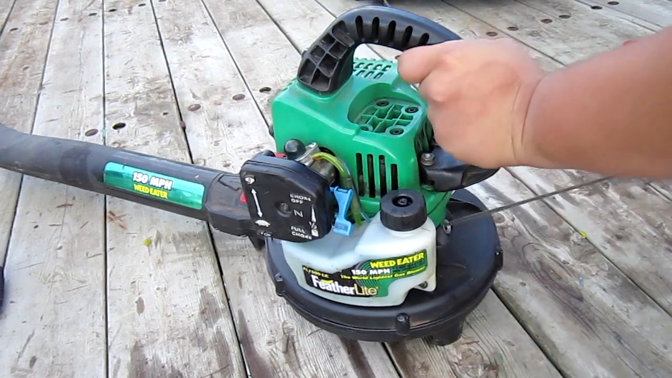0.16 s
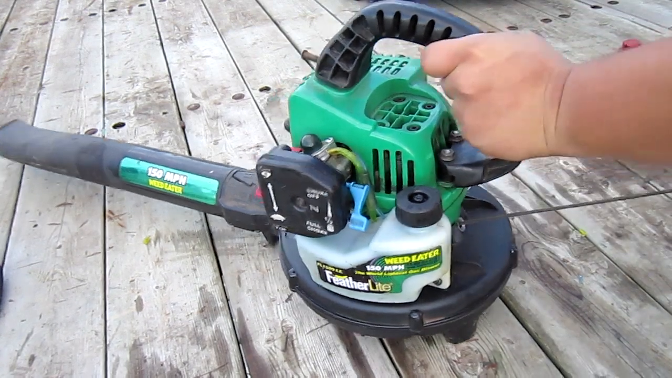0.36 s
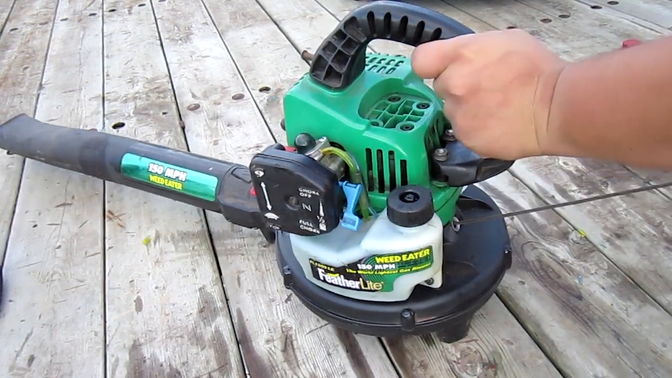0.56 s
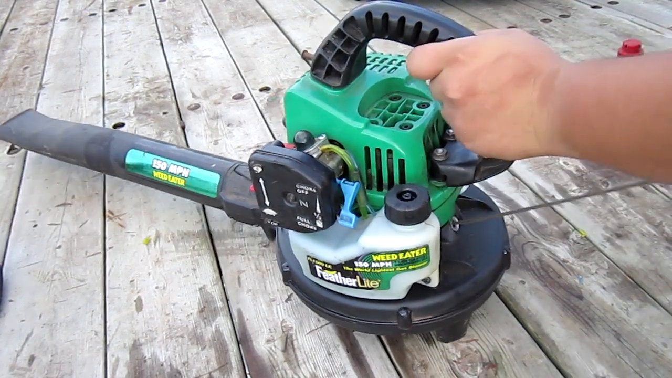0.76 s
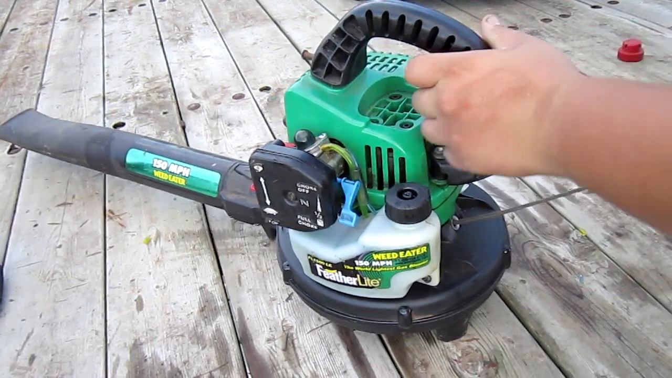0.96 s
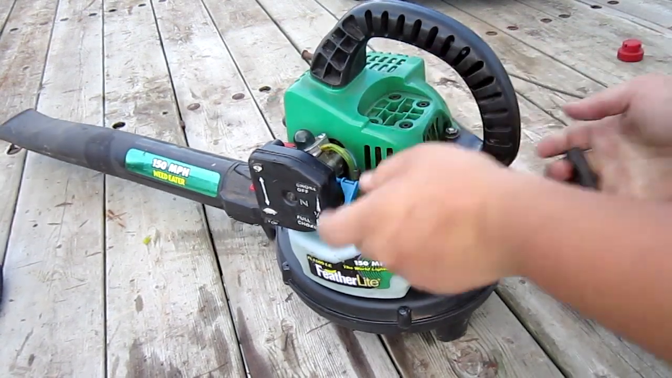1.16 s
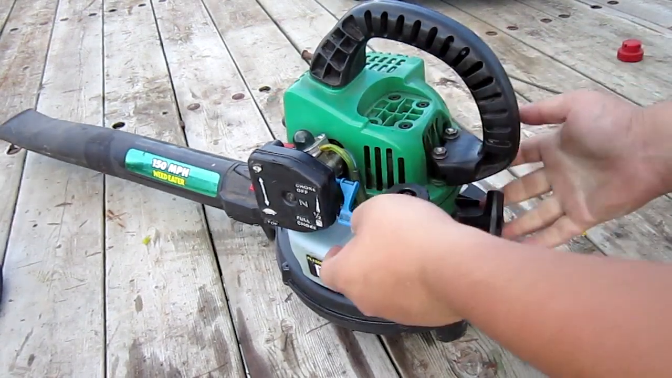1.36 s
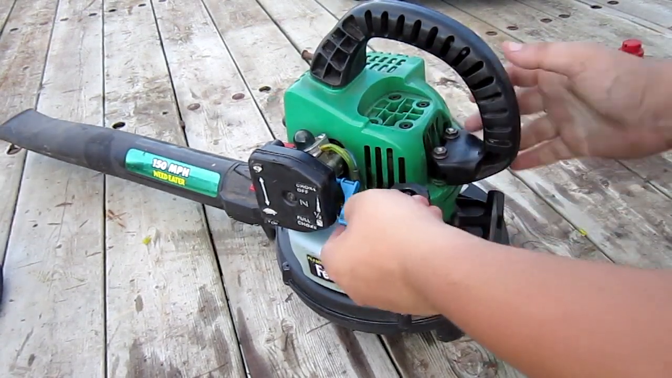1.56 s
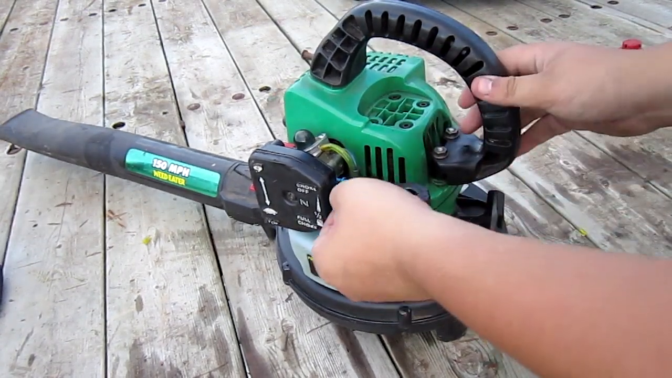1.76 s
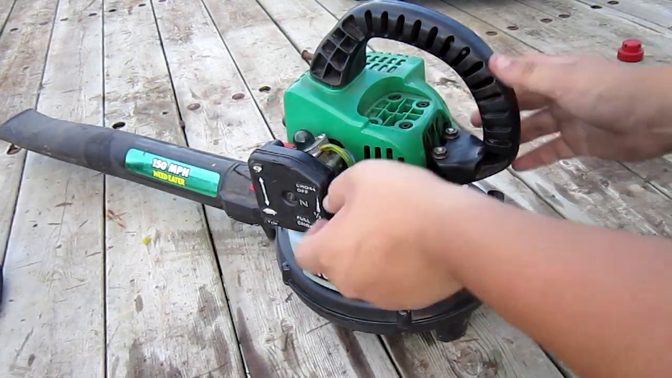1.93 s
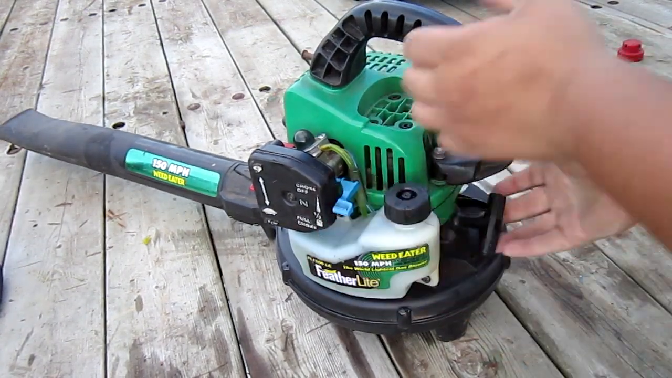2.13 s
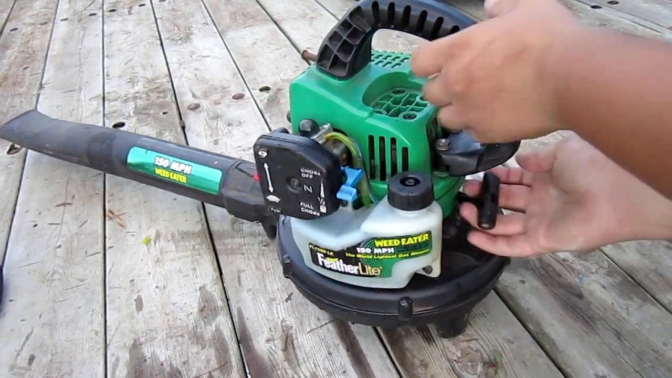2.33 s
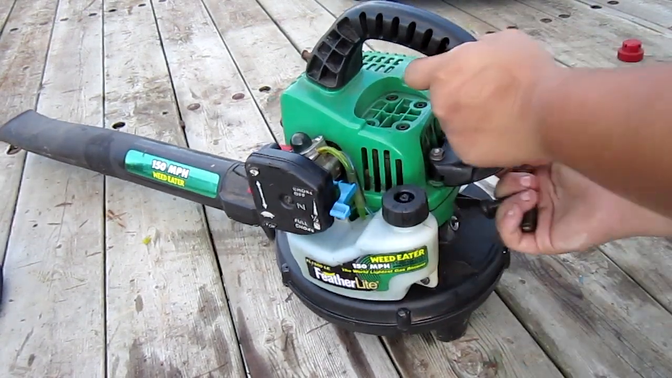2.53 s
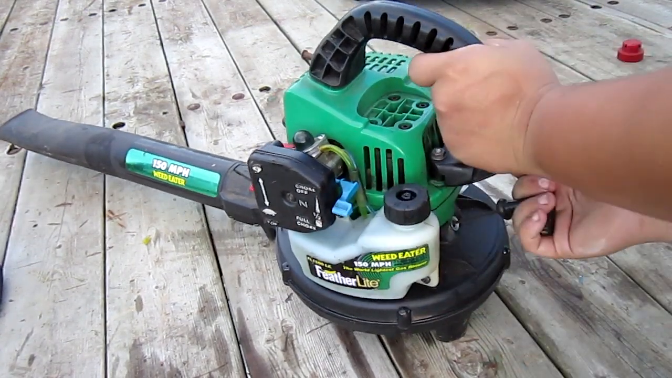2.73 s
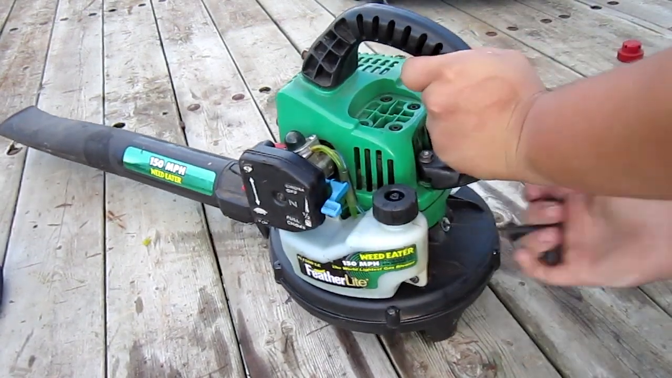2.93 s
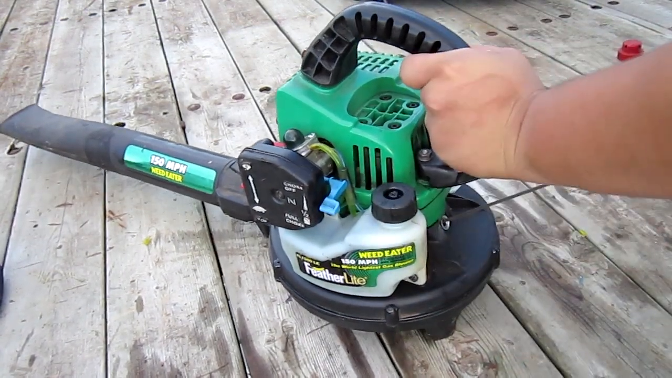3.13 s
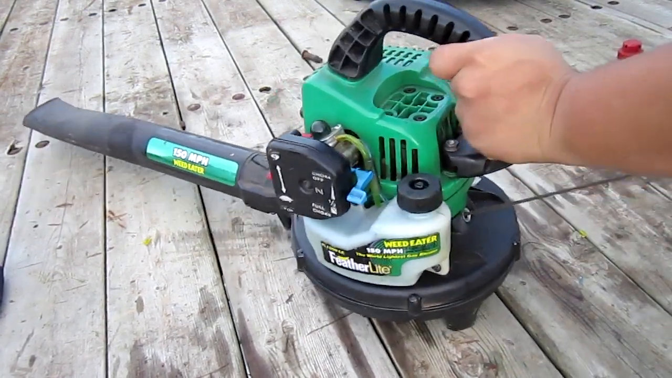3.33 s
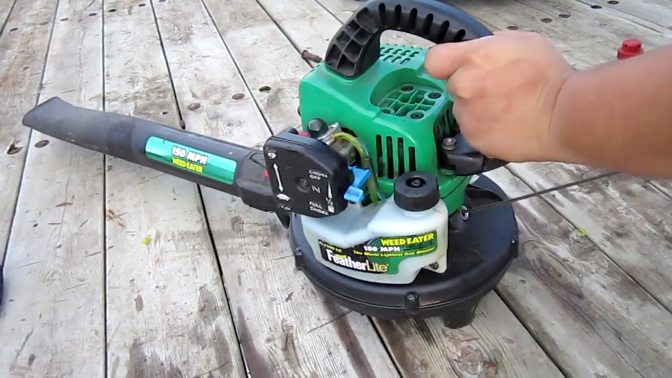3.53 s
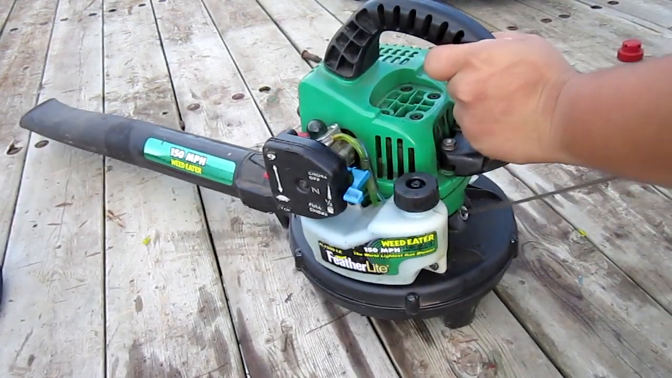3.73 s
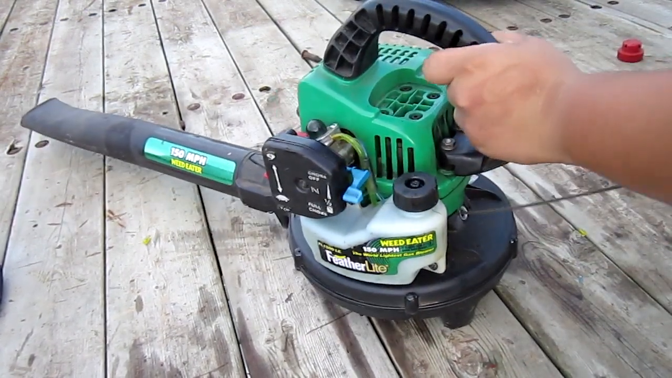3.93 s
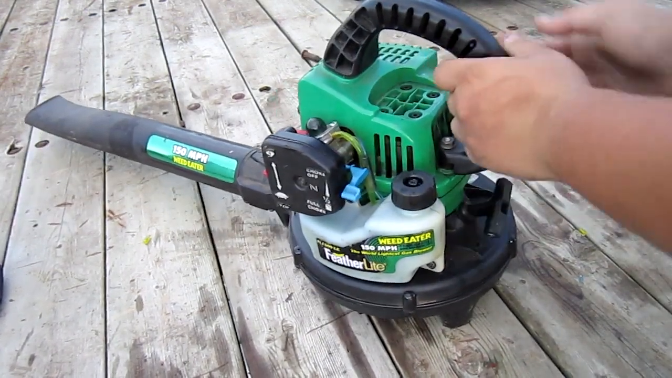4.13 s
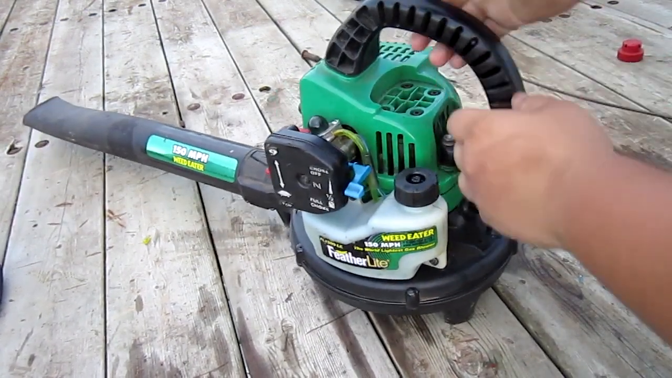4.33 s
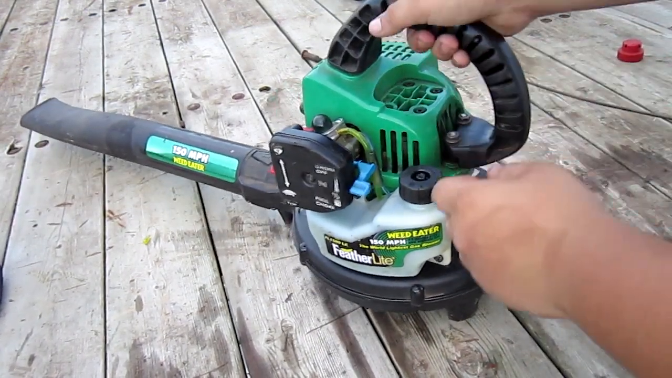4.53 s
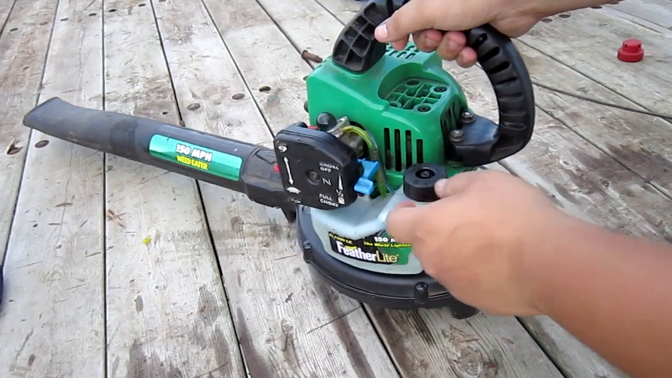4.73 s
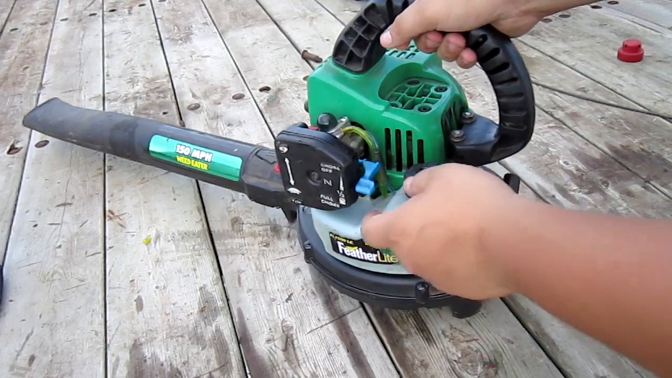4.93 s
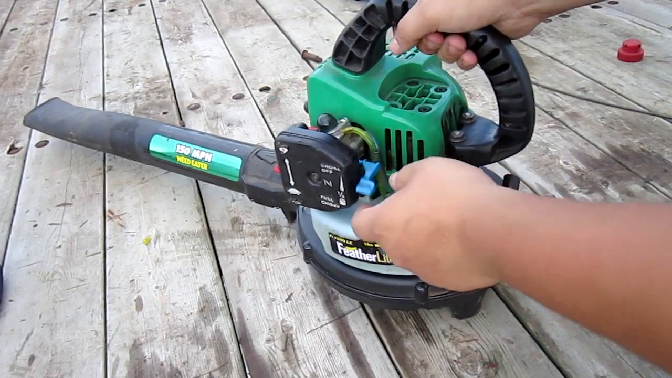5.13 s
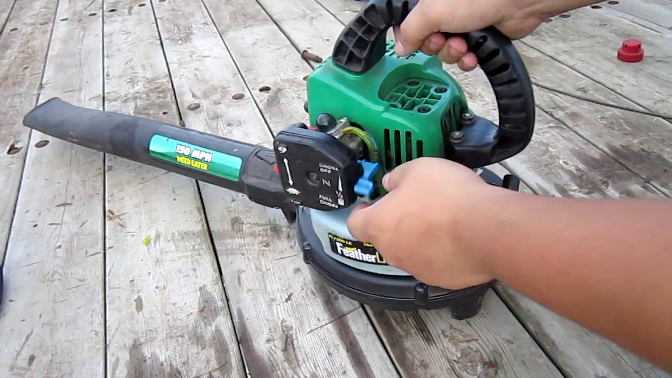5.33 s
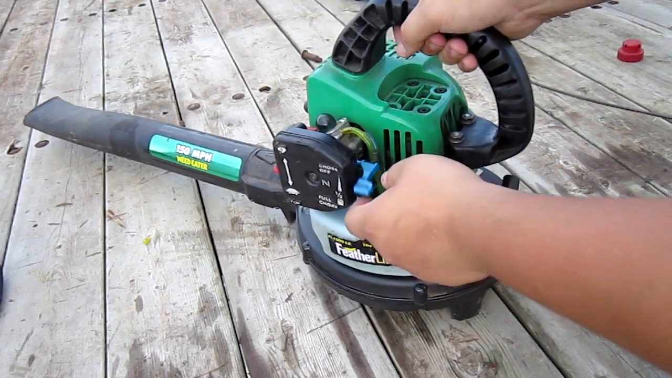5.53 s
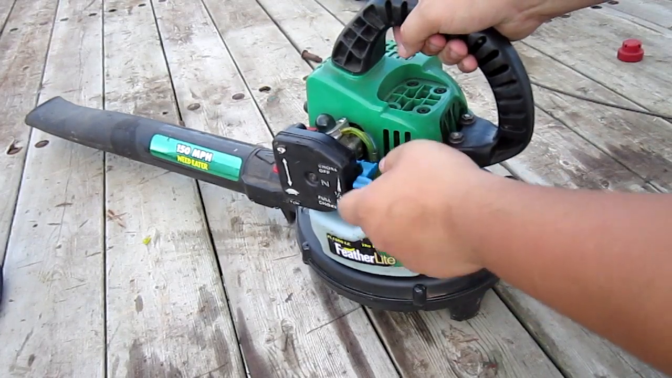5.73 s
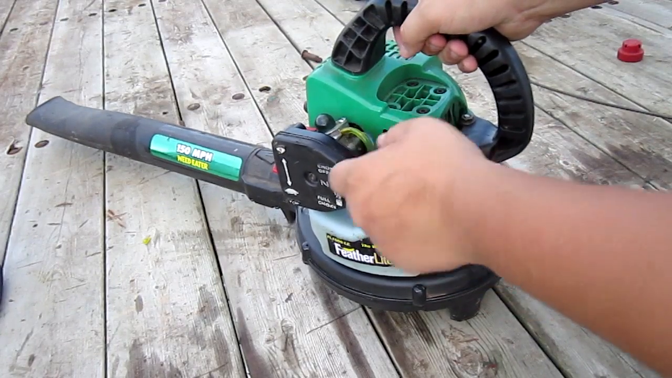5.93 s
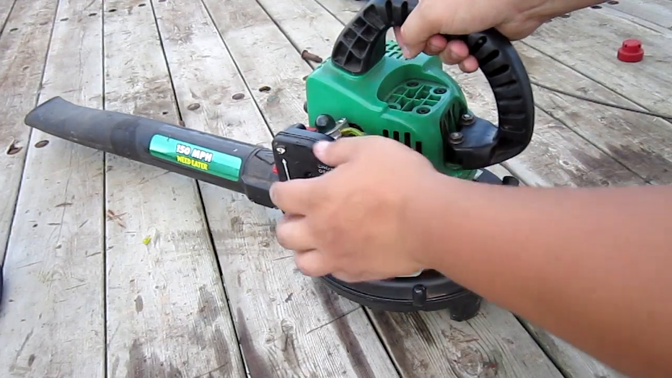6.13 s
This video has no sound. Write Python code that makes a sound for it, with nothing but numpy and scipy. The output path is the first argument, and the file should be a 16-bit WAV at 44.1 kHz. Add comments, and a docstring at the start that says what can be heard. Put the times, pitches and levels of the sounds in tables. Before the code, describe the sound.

A leaf blower is heard close up on a wooden deck outdoors, over faint hiss. Right at the start the starter rope is pulled with a jerky rattle, and the small two-stroke engine turns over in muffled puffs, stopping by 0.8 seconds. From 0.5 seconds the rope rewinds with ratchet clicks that spread out, ending in a sharp plastic knock at 1.4. A lull follows, with very faint distant bird chirps and soft hand brushes. From 2.5 to 3 seconds come several knocks, thumps and small spring twangs. At 3 seconds the rope is pulled again. The engine coughs and pops from about 3.3, stumbles briefly and catches around 4.2. It climbs in pitch to a lumpy idle of hollow puffs, exhaust beats and piston clatter under a rising, throbbing fan hum, still running at the end, around 6.3 seconds.

```python
"""Pull-starting a leaf blower

A small two-stroke, close up on a wooden deck. The first pull only spins it and the rope ratchets home;
on the second it coughs, catches and climbs to a lumpy idle, firing about every third turn. Each turn
gives two hollow port puffs and a piston clatter under the rising fan hum. Far off, a bird chirps."""
import sys
import numpy as np
from scipy import signal
from scipy.fft import rfft, irfft
from scipy.io import wavfile
from scipy.ndimage import uniform_filter1d

SR = 44100
rng = np.random.default_rng(int(sys.argv[2]) if len(sys.argv) > 2 else 0)


def put_to_file(sound):
    """Save the sound as 16-bit audio at rate SR, in the file named by the first command-line argument."""
    columns = np.atleast_2d(sound).T  # one column per channel
    safe = np.clip(columns, -1, 1)
    whole_steps = np.round(safe * 32767)
    wavfile.write(sys.argv[1], SR, whole_steps.astype(np.int16))


N = 277389
T = np.arange(N) / SR

# crank speed on the pull that dies and the pull that catches: (time [s], speed [turns/s])
FIRST_PULL = [(.08, 13.3), (.2, 32), (.38, 34), (.55, 27.4), (.75, 25), (.81, 7.4)]
SECOND_PULL = [(3.0, 10.45), (3.1, 28.61), (3.22, 35.93), (3.5, 34.33), (3.68, 31.81), (3.82, 34.46),
               (4.1, 50.1), (4.27, 61.5), (4.38, 65.2), (4.55, 68.5), (4.72, 70.7), (4.96, 74),
               (5.13, 75.3), (5.22, 77.6), (5.55, 81.6), (5.65, 81.3), (5.9, 82.9), (6.29, 86.1)]
# moments when the firing comes one turn early: (time [s])
EARLY_FIRINGS = [4.88, 5.16, 5.34]
# lone hard firings, before and as the engine catches: (time [s], level [dB])
COUGHS = [(3.35, -16), (3.466, -19.5), (3.642, -14.5), (3.736, -16.5), (3.829, -27), (3.879, -17),
          (3.956, -20), (4.004, -20.5), (4.042, -16), (4.1, -14), (4.163, -23), (4.268, -19), (4.363, -19)]
# resonances of the port cavity, cylinder shroud, muffler shell and blower tube:
# (frequency [Hz], width [Hz], gain [dB])
PORT_MODES = [(802, 60, 9.5), (965, 310, 11), (1130, 260, -22.5), (1700, 500, -37)]
SHROUD_MODES = [(1370, 83, 0), (1470, 67, 2), (1810, 60, 2), (2117, 63, 2), (2770, 110, -8)]
MUFFLER_MODES = [(3536, 260, 2), (5220, 400, -3.5)]
TUBE_MODES = [(510.5, 76, -3), (920, 140, -2.5), (1118, 85, -4), (2900, 150, -6.5)]
# tone colours of the engine's voices: (frequency [Hz], gain [dB])
EXHAUST_EQ = [(35, -36), (75, -32.5), (120, -18), (175, 0), (250, -2), (390, 0), (520, -3), (650, -17),
              (1200, -20), (2500, -37.5), (7500, -60), (11000, -100)]
CLATTER_EQ = [(150, -20), (500, 5), (1300, 6.5), (1800, 4), (2600, -2), (3400, -10.5), (4200, -7),
              (5300, -11.5), (7000, -22.5), (9000, -53.5), (11000, -82.5)]
TICK_EQ = [(500, -21.5), (1700, 12), (2500, -5.5), (3100, -0.5), (3550, -2), (4100, -5), (4800, -5),
           (5300, -8.5), (6000, -18), (7000, -17), (9000, -38), (11000, -64.5)]
COUGH_EQ = [(35, -41), (60, -14.5), (396, 2), (1110, 0.5), (2070, -5.5), (2900, -16.5), (4140, -15),
            (4900, -30), (5560, -22), (6040, -38), (6440, -29.5), (9000, -55), (11700, -84.5),
            (19800, -120)]
# partials of the impeller and the muffler: (multiple of crank speed, relative level [dB])
FAN_TONES = [(7, -24), (14, -25.5), (21, -33), (35, -42)]
DRONE_TONES = [(1, -8.5), (2, -2.5), (3, 1.5), (4, -18), (5, -7), (9, -11), (10, 2.5), (11, -5), (12, -7)]

# rope running over the starter pulley: (start [s], end [s], level [dB])
ROPE_RUNS = [(0.075, 0.122, -31), (0.113, 0.336, -22.5), (0.6, 1.39, -49.5), (2.557, 3.003, -44),
             (2.997, 3.031, -23), (3.032, 3.22, -23)]
# rope jerking against the compression: (time [s], level [dB], pulley ring [Hz])
JERKS = [(.117, -16.5, 373), (.135, -20, 654), (.146, -16.5, 1160), (.186, -24, 393), (.208, -22, 630),
         (.23, -21, 985), (.245, -19, 1900), (.26, -18, 353), (.289, -18, 1150), (.329, -15.5, 393),
         (2.955, -18.5, 1512), (3.027, -16, 638), (3.041, -14, 1150), (3.075, -16, 1190), (3.098, -21, 791),
         (3.118, -19, 1410), (3.129, -22, 1800), (3.146, -19.5, 390), (3.177, -23, 1140), (3.202, -16, 331)]
# pawls scraping as the rope goes back: (start [s], end [s], level [dB])
PAWL_BUZZES = [(0.47, 0.543, -50), (0.608, 0.753, -34), (0.87, 1.125, -55.5)]
# ratchet clicks, spreading out as the pulley slows:
# (time [s], level [dB], relative treble [dB], pulley ring [Hz], pawl ring [Hz])
RATCHET_CLICKS = [(0.499, -17.5, -16.5, 1980, 4130), (0.532, -23.5, -8.5, 1660, 4100),
                  (.568, -13, -19, 1910, 4000), (0.604, -20, -11.5, 1400, 4470),
                  (0.67, -14.5, -22, 1867, 4100), (0.71, -30, -6, 1499, 4530),
                  (0.765, -21, -12.5, 2180, 4170), (.781, -20.5, -20, 2240, 3990),
                  (.808, -27, -30, 2080, 4100), (0.847, -29, -32, 2100, 4100), (.897, -30, -25, 1700, 4100),
                  (0.914, -21, -11.5, 2220, 4670), (0.9399, -17.5, -15.5, 1940, 4770),
                  (0.9643, -23.5, -8, 2270, 4200), (0.9905, -23, -10.5, 1610, 4080),
                  (1.0198, -22, -13.5, 1400, 3600), (1.05, -22, -11, 1830, 4470),
                  (1.0826, -21.5, -14, 2620, 4420), (1.119, -19.5, -12.5, 2170, 4720),
                  (1.173, -17.5, -14.5, 1980, 3760), (1.2469, -19, -10.5, 1590, 4930),
                  (1.3319, -20.5, -8.5, 1430, 4250)]
# deck, housing, pulley and pawls ringing at each click: (frequency [Hz], width [Hz], gain [dB])
RATCHET_MODES = [(202, 17, 12.5), (365, 31, -1), (2060, 180, -15), (2840, 220, -5.5), (4120, 110, 5),
                 (4310, 180, 4.5), (5260, 120, 3), (6600, 72, -1)]
# tone colours of the rope and the pawls: (frequency [Hz], gain [dB])
ROPE_EQ = [(30, -33), (60, -31), (200, -7.5), (285, -12), (380, 4), (510, -6.5), (630, -2), (900, -8),
           (1140, -2), (1350, -9.5), (1900, -11), (3100, -22.5), (5600, -30.5), (9000, -67)]
PAWL_EQ = [(120, -23), (360, 5.5), (700, 4), (950, -5), (1200, 8.5), (1600, 3), (2050, 5.5), (3400, -4),
           (4100, -6), (4900, -6), (6200, -12), (7500, -20), (8600, -35.5), (10000, -64)]
# handle and pawls hitting the housing:
# (time [s], level [dB], relative treble [dB], relative boom [dB], panel ring [Hz])
KNOCKS = [(1.353, -11, -19, -8.5, 636), (2.528, -22, -13, -9, 403), (2.616, -21, -21.5, -10, 422),
          (2.66, -21, -16.5, -5.5, 450), (2.772, -18, -26, -6, 477), (2.848, -13.5, -30.5, -6, 525),
          (2.916, -11, -24, -12.5, 503)]
# modes of the plastic housing: (frequency [Hz], t60 [s], gain [dB])
HOUSING_MODES = [(374, 0.038, 8.5), (451, 0.058, 4.5), (526, 0.11, -5), (700, 0.021, 1), (872, 0.033, -5),
                 (1107, 0.025, -2.5), (1290, 0.055, -12.5), (1480, 0.015, 0), (2010, 0.0064, 0.5),
                 (3310, 0.026, -20)]
# the blower rocking on its feet: (time [s], pitch [Hz], level [dB])
THUMPS = [(1.776, 357, -38), (2.186, 683, -37.5), (2.43, 536, -35), (2.548, 380, -11.5), (2.716, 406, -24),
          (2.805, 370, -18), (2.905, 423, -19.5), (2.969, 505, -19)]
# twangs of the recoil spring: (time [s], level [dB])
TWANGS = [(1.175, -37), (1.25, -36), (2.531, -21.5), (2.794, -31), (2.92, -23), (2.96, -23.5)]
# spring steel ringing in the starter: (time [s], pitch [Hz], t60 [s], level [dB])
STEEL_PINGS = [(1.249, 6600, 0.15, -51), (1.249, 5850, 0.14, -51), (2.958, 5950, 0.068, -37),
               (2.96, 6180, 0.085, -39)]

# hands brushing the grip and the handle: (start [s], length [s], level [dB])
BRUSHES = [(2.188, 0.093, -42.5), (2.258, 0.1, -48.5), (2.441, 0.15, -42)]
# the deck shaking as the blower is pulled, handled or running: (start [s], end [s], level [dB])
DECK_SHAKES = [(0, .6, -47.5), (0.103, .17, -39), (1.9, 2.5, -64), (2.485, 2.997, -43), (3.004, 4.144, -42),
               (4.15, 6.29, -47)]
# notes of a distant bird: (time [s], level [dB])
CHIRPS = [(1.692, -55), (1.742, -57), (1.788, -55), (2.253, -55), (2.3, -53), (2.356, -48.5)]
# tone colours of the hands, the background hiss and the rumble: (frequency [Hz], gain [dB])
BRUSH_EQ = [(150, -11), (400, 0), (1500, -7), (3200, -17), (5500, -27), (9000, -60)]
AIR_EQ = [(150, -22.5), (330, -4), (600, -11), (1500, -14.5), (2300, -18), (4500, -20.5), (5500, -19.5),
          (6100, -30.5), (6700, -29), (7700, -39), (9000, -68)]
RUMBLE_EQ = [(15, -6), (30, -15.5), (110, 1), (190, 4.5), (300, -8), (800, -34.5), (4000, -84)]

CATCH_S, TURNS_PER_FIRING = 4.2, 3
FULL_TURNS_PER_S, IDLE_TURNS_PER_S = 65.6, 80.3
GAS_DB = -32  # breath trailing each puff and exhaust beat


def start_attempts():
    """The closed choke muffles the first pull; the second surges at each cough, stumbles and runs."""
    choked = engine(FIRST_PULL, port_db=-34, clatter_db=-34)
    running = engine(SECOND_PULL, port_db=-23, clatter_db=-31.5)
    stumble_s = 4.115
    cough_s = np.array(COUGHS)[:, 0]
    surge_db = fade(strikes(cough_s, np.ones(len(cough_s))), decay_s=.24) * (T < stumble_s)
    stumble_db = -4 * span(stumble_s, 4.225, attack_s=.0074, release_s=.071)
    return choked + running * undb(surge_db + stumble_db)


def engine(speed, port_db, clatter_db):
    """The crank times the ports, exhaust and piston, which all grow louder as it speeds up."""
    angle = crank(speed)
    turns = np.arange(1, int(angle[-1]) + 1)

    def at(share):
        """The time at which each turn is this far round."""
        return np.interp(turns + share, angle, T)

    fires = firings(at(0))
    # every turn is a little different, half as much once the engine runs
    scatter = rng.standard_normal((len(turns), 7)).T * np.where(at(0) < CATCH_S, 1, .5)
    first_lag, first_size, second_lag, second_size, exhaust_lag, charge_size, slap_size = scatter
    opening_s = at(.6 + .0034 * exhaust_lag)  # the exhaust port opens late in the turn
    puffs = strikes(at(.005 * first_lag), undb(first_size))
    puffs += strikes(at(.37 + .011 * second_lag), undb(3 + 1.2 * second_size))
    puffs = with_gas(puffs, decay_s=.009)
    beats = puffs + strikes(opening_s, undb(2) * fires)  # a fired turn adds a third puff
    voices = (  # (sound, level at full speed [dB], rise per doubling of speed [dB])
        (ports(beats), port_db, 9.5),
        (exhaust(opening_s, fires, charge_size, puffs), -24, 12),
        (shroud(beats), -42.5, 13),
        (piston(opening_s, slap_size), clatter_db, 3.5))
    mix = sum(undb(db) * effort(speed, rise_db) * steady(x) for x, db, rise_db in voices)
    spin_up = np.clip((T - speed[0][0]) / .13, 0, 1)
    return spin_up * mix + undb(-35.5) * firing_ticks(opening_s, fires, charge_size)


def firings(turn_s):
    """Which turns fire: running rich, every third one, and now and then one early."""
    count = np.arange(len(turn_s)) - np.searchsorted(turn_s, CATCH_S)
    count += np.searchsorted(EARLY_FIRINGS, turn_s)
    return (turn_s >= CATCH_S) & (np.diff(count // TURNS_PER_FIRING, prepend=-1) > 0)


def ports(beats):
    """Every puff rings the same hollow cavity behind the ports."""
    cavity = resonances(beats, PORT_MODES)
    return cut(resonate(cavity, hz=803, width_hz=670), 3500)


def exhaust(opening_s, fires, charge_size, puffs):
    """A fired charge leaves harder than an empty one; the muffler's chambers echo each beat."""
    blows = strikes(opening_s, undb(11 * fires + charge_size))
    pipe = colour(with_gas(blows, decay_s=.025) + .41 * puffs, EXHAUST_EQ)
    echoes = ((.0013, -.25), (.0056, .08), (.0093, .05))
    return pipe + sum(gain * np.interp(T - delay_s, T, pipe) for delay_s, gain in echoes)


def shroud(beats):
    """The cylinder and its shroud ring with every beat."""
    return cut(resonances(beats, SHROUD_MODES), 3200, order=4)


def piston(opening_s, slap_size):
    """The piston slaps once a turn and scrapes unevenly in the bore."""
    slap = burst(opening_s - .002, undb(2 * slap_size), hold_s=.0053, decay_s=.013)
    scrape = undb(-23.5 + 1.5 * flutter(N, 60).real)
    return colour((slap + scrape) * grit(5000, 3.7), CLATTER_EQ)


def firing_ticks(opening_s, fires, charge_size):
    """Each fired charge gives a sharp tick that rings the muffler shell."""
    envelope = burst(opening_s - .002, fires * undb(2.5 * charge_size), hold_s=.0038, decay_s=.012)
    ticks = colour(envelope * rng.standard_normal(N), TICK_EQ)
    return unit(ticks + resonances(ticks, MUFFLER_MODES), T > CATCH_S)


def fan():
    """The impeller's hum throbs at the firing rate; its tones climb through the tube's resonances."""
    turns = crank(SECOND_PULL)
    cycle = 2 * np.pi * turns / TURNS_PER_FIRING
    surge = .009 * np.sin(cycle)  # the crank runs ahead, then lags, in each firing cycle
    wander = .007 * flutter(N, 9).real
    angle = 2 * np.pi * (turns + surge + wander)
    hum = 0
    for multiple, db in FAN_TONES:
        tone = (1 + .28 * flutter(N, 38)) * np.exp(1j * multiple * angle)
        hum += undb(db) * np.sqrt(2) * tone.real
    throb = 1 - .55 * np.cos(cycle)
    hum *= throb * effort(SECOND_PULL, rise_db=23)
    leak = undb(-13.5) * hum  # this much bypasses the tube
    return leak + resonances(hum, TUBE_MODES)


def drone():
    """The muffler smooths the even part of the beat into clean tones, which swell toward idle."""
    angle = 2 * np.pi * crank(SECOND_PULL)
    tones = sum(undb(db) * np.sin(multiple * angle) for multiple, db in DRONE_TONES)
    doublings = np.log2(curve(SECOND_PULL) / IDLE_TURNS_PER_S + 1e-9)
    return np.sqrt(2) * tones * undb(-32.5 + 25.5 * doublings)


def coughs():
    """Lone firings: a sharp pop and a short rush of gas."""
    times, db = np.transpose(COUGHS)
    pops = 6 * strikes(times, undb(db))
    gas = burst(times, undb(db), hold_s=.00035, decay_s=.0068) * rng.standard_normal(N)
    return colour(pops + gas, COUGH_EQ)


def starter():
    """The pulley's jolting rattle roughens both the rope and the pawls."""
    jolts = fade((rng.random(N) < 130 / SR) * rng.random(N), decay_s=.0047)
    rattle = unit((.5 + jolts) * grit(3500, 2.54))
    return rope(rattle) + ratchet(rattle)


def rope(rattle):
    """The rope runs over the pulley and knocks it at each jerk against the compression."""
    times, levels_db, _ = np.transpose(JERKS)
    tension = spans(ROPE_RUNS, attack_s=.0091, release_s=.0047)
    tension += burst(times, undb(levels_db), hold_s=.0013, decay_s=.007)
    rings = thuds([(s, hz, db - 1.5) for s, db, hz in JERKS], attack_s=.00077, t60_s=.03)
    return colour(rattle * tension, ROPE_EQ) + rings


def ratchet(rattle):
    """As the rope goes home the pawls buzz and click, each tooth with its own ring."""
    buzz = rattle * spans(PAWL_BUZZES, attack_s=.019, release_s=.015)
    times, db, treble_db, pulley_hz, pawl_hz = np.transpose(RATCHET_CLICKS)
    dull, bright = (burst(times - .002, undb(level), hold_s=.0048, decay_s=.0057) * grit(7000, .52)
                    for level in (db - 4, db + treble_db + 11))
    clicks = cut(dull, 2800) + cut(bright, 3200, "high")
    pawls = colour(buzz + clicks, PAWL_EQ)
    pawl_rings = sum(ping(s + .003, hz, t60_s=.026, db=level + 4.5)
                     for s, hz, level in zip(times, pawl_hz, db + treble_db))
    pulley_rings = sum(ping(s + .0021, hz, t60_s=.028, db=level - 6)
                       for s, hz, level in zip(times, pulley_hz, db))
    return pawls + pawl_rings + pulley_rings + resonances(pawls, RATCHET_MODES)


def knocks():
    """Each knock cracks, chatters for a moment and rings the plastic housing."""
    times, db, treble_db, boom_db, panel_hz = np.transpose(KNOCKS)
    t, rough, body = T[:SR // 4], grit(3300, .72), 0
    for k, (hz, t60_s, mode_db) in enumerate(HOUSING_MODES):
        # where the blow lands decides how much the lowest modes boom
        size_db = db + mode_db + boom_db * (k < 3)
        blow = strikes(times + .00093, undb(size_db - 5))
        chatter = burst(times, undb(size_db - 28), hold_s=.0044, decay_s=.0053) * rough
        ring = undb(-60 * t / t60_s) * np.sin(2 * np.pi * hz * t) * (-1) ** k
        body += signal.fftconvolve(blow + chatter, ring)[:N]
    crack = burst(times, undb(db + treble_db + 12), hold_s=.00046, decay_s=.0038) * grit(8000, .85)
    panels = thuds(zip(times + .00095, panel_hz, db), attack_s=.0014, t60_s=.039)
    return body + panels + colour(crack, PAWL_EQ)


def thumps():
    """The blower's feet land softly on the deck, and the board answers lower and longer."""
    board_hz = 207.7
    feet = thuds(THUMPS, attack_s=.0018, t60_s=.057)
    board = thuds([(s, board_hz, db - 15.5) for s, _, db in THUMPS], attack_s=.0018, t60_s=.28)
    return feet + board


def spring():
    """Highs travel faster along the coil, so each rough twang falls in pitch; the steel also pings."""
    twangs, t = np.zeros(N), T[:SR // 5]
    hz = 950 / (1 + t / .028)
    sweep = np.exp(2j * np.pi * np.cumsum(hz) / SR)
    envelope = (1 - np.exp(-t / .012)) * np.exp(-t / .025)
    for s, db in TWANGS:
        twangs[int(s * SR):][:len(t)] += 2 * undb(db) * envelope * (sweep * flutter(len(t), 190)).real
    return twangs + sum(ping(*row) for row in STEEL_PINGS)


def deck_echoes(x):
    """Boards and housing throw back a short scatter of echoes."""
    t, t60_s = T[:SR // 5], .11
    echoes = rng.standard_normal(len(t)) * undb(-60 * t / t60_s) * (t > .003)
    return x + undb(-18.5) * signal.fftconvolve(x, echoes / np.linalg.norm(echoes))[:N]


def hands():
    """Hands brush the starter grip and the handle in soft swishes."""
    return noise(BRUSH_EQ) * sum(undb(db) * swell(s, length_s) for s, length_s, db in BRUSHES)


def bird():
    """A small bird far off: faint whistles, each one falling."""
    start_hz, fall_hz_per_s, length_s = 4570, 9000, .038
    song = np.zeros(N)
    for s, db in CHIRPS:
        cycles = (T - s) * (start_hz - fall_hz_per_s * (T - s) / 2)
        song += undb(db) * swell(s, length_s) * np.sin(2 * np.pi * cycles)
    return song


def background():
    """The recorder's automatic gain briefly ducks the background hiss, which sputters and creeps back."""
    duck_s = (1.424, 1.688)  # the duck is drawn as a timed envelope
    sputter_db = 11 * np.tanh(4 * flutter(N, 45).real)
    duck_db = (sputter_db - 13.5) * span(*duck_s, attack_s=.026, release_s=.002)
    creep_db = -3.5 * span(*duck_s, attack_s=.02, release_s=.572)
    recorder_gain = undb(duck_db + creep_db)
    hiss = noise(AIR_EQ) * undb(-49) * recorder_gain
    # the low rumble ducks too, and swells when the blower shakes the deck
    shaking = spans(DECK_SHAKES, attack_s=.076, release_s=.058)
    rumble = noise(RUMBLE_EQ) * (undb(-54) * recorder_gain + shaking)
    return hiss + rumble


def crank(speed):
    """Turns made since the pull began."""
    return np.cumsum(curve(speed)) / SR


def effort(speed, rise_db):
    """Gain that grows by rise_db per doubling of crank speed, up to full speed; silent at rest."""
    share = np.clip(curve(speed) / FULL_TURNS_PER_S, 0, 1)
    return (share > 0) * undb(rise_db * np.log2(share + 1e-9))


def with_gas(pulses, decay_s):
    """Trail each pulse with a breath of gas noise."""
    return pulses + undb(GAS_DB) * fade(pulses, decay_s) * rng.standard_normal(N)


def ping(start_s, hz, t60_s, db):
    """A starter part rings on a close pair of tones."""
    pair = [(start_s, hz, db), (start_s, .9 * hz, db - 6.94)]
    return thuds(pair, attack_s=.00042, t60_s=t60_s)


def thuds(rows, attack_s, t60_s):
    """Single struck tones dying away: (time [s], pitch [Hz], level [dB])."""
    out, t = np.zeros(N), T[:SR // 4]
    envelope = undb(-60 * t / t60_s) * (1 - np.exp(-t / attack_s))
    for s, hz, db in rows:
        out[int(s * SR):][:len(t)] += undb(db) * envelope * np.sin(2 * np.pi * hz * t)
    return out


def strikes(times, sizes):
    """Impulses of the given sizes at the given times."""
    return np.bincount(np.clip(np.asarray(times) * SR, 0, N).astype(int), sizes, N + 1)[:N]


def grit(per_s, spread_db):
    """Dense tiny impacts of uneven size, rms 1."""
    impacts = (rng.random(N) < per_s / SR) * rng.choice([-1, 1], N)
    return unit(impacts * undb(spread_db * rng.standard_normal(N)))


def noise(eq):
    """A steady noise bed with the given tone colour."""
    return colour(rng.standard_normal(N), eq)


def flutter(size, width_hz):
    """Slow complex noise, rms 1: it widens a pure tone into a narrow band."""
    eddies = cut(rng.standard_normal(size + SR) + 1j * rng.standard_normal(size + SR), width_hz)
    return eddies[SR:] / np.std(eddies)


def fade(x, decay_s):
    """Let each impulse die away exponentially."""
    return signal.lfilter([1], [1, -np.exp(-1 / (decay_s * SR))], x)


def burst(times, sizes, hold_s, decay_s):
    """Envelope of a short chatter: it builds while the parts touch, then dies."""
    touch = signal.windows.hann(max(int(hold_s * SR), 3))
    return signal.fftconvolve(fade(strikes(times, sizes), decay_s), touch / touch.sum())[:N]


def span(start_s, end_s, attack_s, release_s):
    """Attack, hold and release, from 0 to 1."""
    return np.clip((T - start_s) / attack_s, 0, 1) * np.clip(1 - (T - end_s) / release_s, 0, 1)


def spans(rows, attack_s, release_s):
    """Held envelopes added up: (start [s], end [s], level [dB])."""
    return sum(undb(db) * span(start, end, attack_s, release_s) for start, end, db in rows)


def swell(start_s, length_s):
    """One smooth rise and fall, from 0 to 1."""
    return np.sin(np.pi * np.clip((T - start_s) / length_s, 0, 1)) ** 2


def curve(rows):
    """Breakpoints joined by straight lines, zero outside them."""
    return np.interp(T, *np.transpose(rows), left=0, right=0)


def colour(x, eq):
    """Minimum-phase EQ with unit energy."""
    hz, db = np.transpose(eq)
    size = 4096
    bins = np.maximum(np.fft.rfftfreq(size, 1 / SR), 1)
    cepstrum = irfft(np.log(undb(np.interp(np.log(bins), np.log(hz), db))))
    cepstrum[1:size // 2] *= 2
    cepstrum[size // 2 + 1:] = 0
    response = irfft(np.exp(rfft(cepstrum)))
    return signal.fftconvolve(x, response / np.linalg.norm(response))[:len(x)]


def cut(x, hz, keep="low", order=2):
    """Low-pass or high-pass filter."""
    return signal.sosfilt(signal.butter(order, hz, keep, fs=SR, output="sos"), x)


def resonate(x, hz, width_hz):
    """One resonance with gain 1 at its centre."""
    return signal.lfilter(*signal.iirpeak(hz, hz / width_hz, fs=SR), x)


def resonances(x, modes):
    """A bank of resonances side by side."""
    return sum(undb(db) * resonate(x, hz, width_hz) for hz, width_hz, db in modes)


def steady(x):
    """Even out the slow level, keeping the shape of single pulses."""
    return x / np.sqrt(np.abs(uniform_filter1d(x ** 2, size=SR // 5)) + 1e-4 * np.mean(x ** 2))


def unit(x, where=slice(None)):
    """Scale to rms 1 over the given samples."""
    return x / np.sqrt(np.mean(x[where] ** 2) + 1e-18)


def undb(db):
    """Decibels to gain."""
    return 10 ** (np.asarray(db) / 20)


def scene():
    """The blower on its deck, over the background hiss, in mono."""
    blower = start_attempts() + fan() + coughs() + starter() + knocks() + thumps() + spring()
    return (deck_echoes(blower) + drone() + bird() + background() + hands())[None]


def record(dry):
    """Soft saturation rounds the loudest peaks, and a steep low-pass takes off the top."""
    ceiling, top_hz = .34, 10200
    rounded = ceiling * np.tanh(dry / ceiling)
    return signal.sosfilt(signal.ellip(8, .2, 70, top_hz, fs=SR, output="sos"), rounded)


dry = scene()
out = record(dry)
put_to_file(out)
```